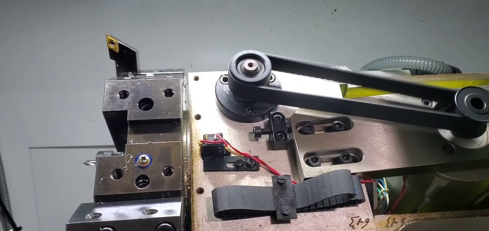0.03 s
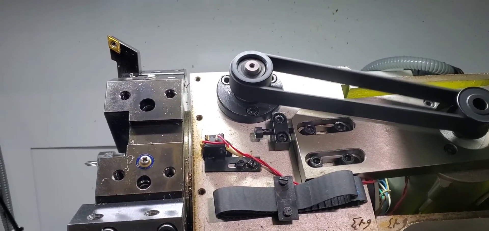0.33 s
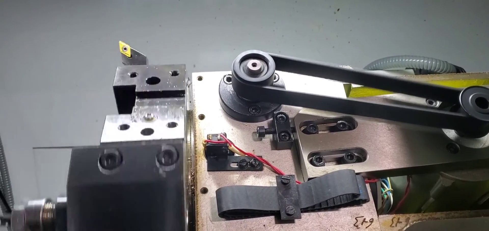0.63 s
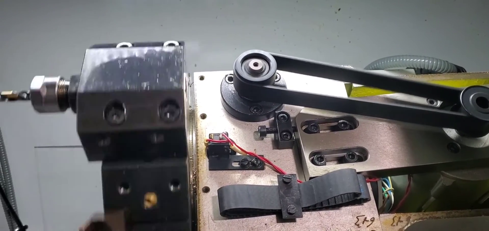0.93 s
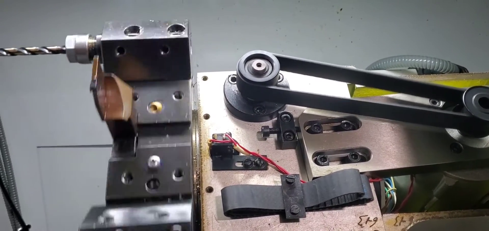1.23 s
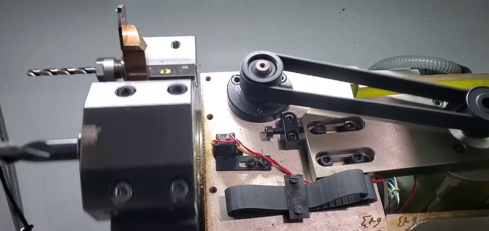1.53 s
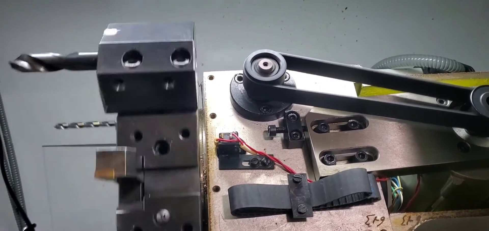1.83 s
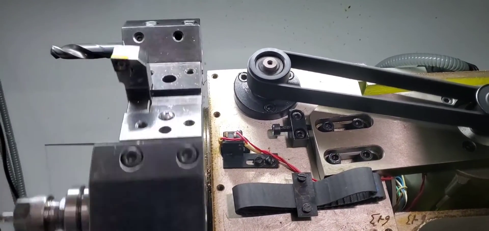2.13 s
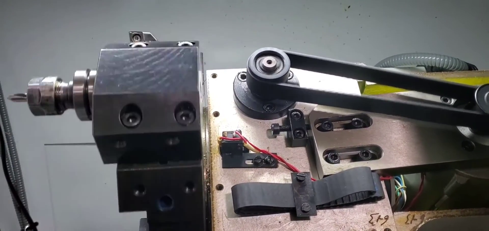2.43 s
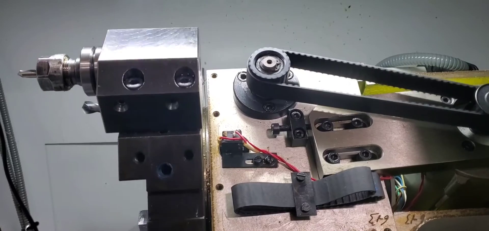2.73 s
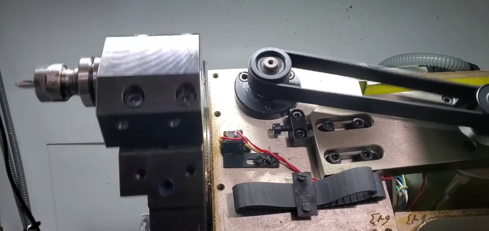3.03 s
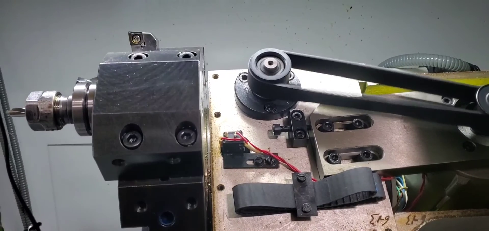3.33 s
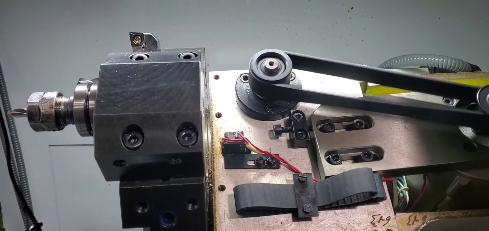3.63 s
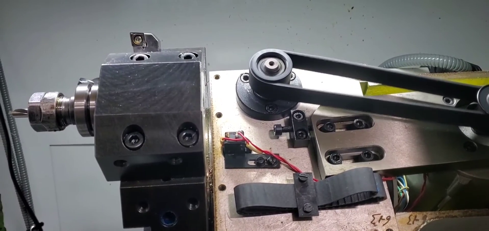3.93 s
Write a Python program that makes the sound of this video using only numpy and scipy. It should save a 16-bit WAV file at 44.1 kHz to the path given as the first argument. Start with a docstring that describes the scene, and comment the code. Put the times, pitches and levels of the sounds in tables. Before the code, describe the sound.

A lathe tool turret rotates close by inside a sheet-metal enclosure, over idling machinery. A solenoid chatters with a ringing hiss until an unlocking thump at about 0.5 seconds. A geared motor hums, with five evenly spaced metal clacks from 0.9 to 2.4 seconds, then coasts. Near 3 seconds come a faint squeak, a latching clack and a clamping clunk, and the chatter and hiss return until 4 seconds.

```python
"""A lathe's tool turret indexes inside its sheet-metal enclosure, close by, over idling machinery.
A mains solenoid chatters in a ringing hiss until the turret unlocks with a thump at 0.55 s.
A geared motor turns it, a pawl clacks at each of five stations, and from 2.4 s the motor coasts.
Near 3 s the head squeaks into its seat, the pawl latches and the turret clamps with a clunk.
The chatter and the hiss return."""
import sys
import numpy as np
from scipy import signal
from scipy.fft import rfft, irfft
from scipy.io import wavfile
from scipy.ndimage import uniform_filter1d

SR = 44100
rng = np.random.default_rng(int(sys.argv[2]) if len(sys.argv) > 2 else 0)


def waveform_to_disk(signal):
    """Save audio, clipped to [-1, 1], as 16-bit WAV at the path in sys.argv[1]."""
    frames = np.transpose(np.atleast_2d(signal))
    scaled = np.clip(frames, -1, 1) * 32767
    samples = np.round(scaled).astype(np.int16)
    wavfile.write(sys.argv[1], SR, samples)


N = 176400
TIME_S = np.arange(N) / SR
TAIL_S = TIME_S[:SR // 2]


def undb(db):
    """Decibels to gain."""
    return 10 ** (np.asarray(db) / 20)


def curve(rows, column=1):
    """One table column interpolated over time."""
    rows = np.array(rows, float)
    return np.interp(TIME_S, rows[:, 0], rows[:, column])


def unit(x):
    """Scale to unit mean energy per channel."""
    return x / np.sqrt(np.sum(x ** 2) / len(np.atleast_2d(x)))


def level(x, rms_db):
    """Scale to an rms level."""
    return x * undb(rms_db) / np.sqrt(np.mean(x ** 2))


def pan(left_db):
    """Stereo gains, left over right by left_db."""
    return undb(np.array([[left_db], [-left_db]]) / 2)


def colour(x, points):
    """Minimum-phase filter through (freq_hz, gain_db) points."""
    size = 2 ** 18
    hz, db = np.array(points, float).T
    bins_hz = np.arange(size // 2 + 1) * SR / size
    log_gain = np.log(undb(np.interp(np.log(bins_hz + 1), np.log(hz), db)))
    cepstrum = irfft(log_gain)[:size // 2]
    cepstrum[0] /= 2
    return irfft(rfft(x, size) * np.exp(rfft(2 * cepstrum, size)))[..., :x.shape[-1]]


# Stereo width: freq_hz, side_gain_db
WIDTH = [(60, -29), (120, -28), (200, -16), (380, -8), (700, -3), (1300, -1), (2400, 0), (16000, -.3)]

def spread(pair):
    """Two unrelated signals as a stereo field: narrow bass, wide treble."""
    side = colour(pair[1], WIDTH)
    return np.array([pair[0] + side, pair[0] - side])


def noise(size=N):
    """Diffuse stereo noise."""
    return spread(rng.standard_normal((2, size)))


def drift(rate_hz):
    """Slow random wander, rms 1."""
    hold = int(SR / rate_hz)
    steps = np.repeat(rng.standard_normal(N // hold + 1), hold)
    return level(uniform_filter1d(steps, hold)[:N], 0)


def decay(t60_s):
    """Exponential tail."""
    return np.exp(-np.log(1000) * TAIL_S / t60_s)


def ring(modes):
    """Metal modes, each at a random phase per channel."""
    return unit(sum(undb(db) * decay(t60_s) * np.sin(2 * np.pi * (hz * TAIL_S + rng.random((2, 1))))
                    for hz, db, t60_s in modes))


def add(track, start_s, sound):
    """Mix a sound into a track."""
    i = int(np.clip(start_s * SR, 0, N - 1))
    track[..., i:i + sound.shape[-1]] += sound[..., :N - i]


def contact(length_s):
    """Steel on steel: a rush of tiny rebounds that swells and dies."""
    age = TIME_S[:SR // 40] / length_s
    return unit(np.tanh(rng.standard_normal(len(age))) * np.sqrt(age) * np.exp(-age ** 2))


def crack(length_s, left_db):
    """Direct sound of a contact, in stereo."""
    return np.array([contact(length_s), contact(length_s)]) * pan(left_db)


def enclosure(spectrum):
    """Dense echoes off the sheet-metal walls; the treble dies first."""
    echoes = noise(len(TAIL_S))
    treble = signal.sosfilt(signal.butter(1, 7000, "high", fs=SR, output="sos"), echoes)
    tail = (echoes - treble) * decay(t60_s=0.23) + treble * decay(t60_s=0.063)
    build_up = 1 - np.exp(-TAIL_S / 0.0021)
    return unit(colour(tail * build_up, spectrum))


# Fan noise: freq_hz, gain_db
FAN_SPECTRUM = [(25, -29), (45, -5), (64, -6), (100, -16.5), (150, -10), (240, -8.5), (330, -9), (500, -21),
                (1050, -28), (1350, -41), (2100, -31), (3200, -34), (4200, -37), (6800, -38), (8500, -48),
                (9800, -37), (10700, -32), (12200, -32), (13300, -40), (16000, -37)]
# Machine hums: pitch_hz, level_db
SHOP_HUMS = [(59.4, -51.5), (176.8, -50), (329.7, -57.5), (360.3, -54), (1100, -69), (14595, -69),
             (15579, -74)]

def workshop():
    """Idling machinery: fan noise and wavering hums."""
    hums = sum(undb(db + drift(4.8)) * np.sqrt(2) * np.sin(2 * np.pi * hz * TIME_S + 0.1 * drift(2.76))
               for hz, db in SHOP_HUMS)
    return level(colour(noise(), FAN_SPECTRUM), rms_db=-48) + hums


def whine(pitch_hz=3230, pulse_hz=9):
    """Faint, pulsing electrical whine of the idle drive."""
    band = [(pitch_hz * 0.86, -40), (pitch_hz, 0), (pitch_hz * 1.06, -40)]
    pulse = (1 + np.sin(2 * np.pi * pulse_hz * TIME_S)) / np.sqrt(2)
    return level(colour(noise(), band), -64) * pulse


def squeak(pitch_hz=1105, peak_s=2.965, width_s=0.028):
    """Steel rubs briefly as the head creeps into its seat."""
    band = [(pitch_hz * 0.91, -40), (pitch_hz, 0), (pitch_hz * 1.023, -40)]
    swell = np.exp(-((TIME_S - peak_s) / width_s) ** 2)
    return level(colour(noise(), band), -48) * swell


# Motor harmonics: turn_multiple, gain_db
HUM_LINES = [(5, -36.5), (6, -31), (12, -58), (19, -68), (20, -67), (21, -50), (23, -51), (24, -61),
             (28, -49.5)]
# Hum envelope: time_s, gain_db
HUM_ENVELOPE = [(.55, -26), (.72, -13), (.8, -3.5), (.9, -4.5), (.935, -32), (.98, -4), (1.3, -7),
                (2.0, -2.5), (2.4, -4.5), (2.44, -9), (2.55, -23)]
# Gear noise: freq_hz, gain_db
GEAR_SPECTRUM = [(150, -16.5), (240, -3), (290, -31.5), (330, -10), (400, 2), (560, -4.5), (700, -6.5),
                 (820, -3), (1080, -1), (1300, -6), (1550, -13.5), (2130, -7), (2600, -14.5), (3700, -9.5),
                 (4400, -14.5), (6900, -13.5), (8200, -25), (16000, -29.5)]
# Gear and rumble envelope: time_s, gain_db
GEAR_ENVELOPE = [(.52, -1), (.57, 4.5), (.72, 1), (.88, 3), (1.0, -1.5), (1.6, -0.5), (2.1, -2), (2.41, -1),
                 (2.48, -9.5), (2.58, -15.5), (2.75, -30), (3.0, -15.5)]

def motor(turn_hz=20.02, zero_phase_s=1.512, repeat_share=0.55, throb_db=1.5, throb_lag_s=0.021):
    """The drive hums on multiples of its turn rate; the gears' grind throbs and partly repeats."""
    angle = 2 * np.pi * turn_hz * (TIME_S - zero_phase_s)
    hum = sum(undb(db + 1.4 * drift(5.84)) * np.sqrt(2) * np.cos(k * angle + 0.066 * drift(3.6))
              for k, db in HUM_LINES)
    one_turn = rng.standard_normal((2, int(SR / turn_hz)))
    teeth = np.tile(one_turn, int(N / SR * turn_hz) + 2)[:, :N]
    grind = np.sqrt(repeat_share) * spread(teeth) + np.sqrt(1 - repeat_share) * noise()
    gears = level(colour(grind, GEAR_SPECTRUM), -36)
    throb = undb(throb_db * np.cos(angle - 2 * np.pi * turn_hz * throb_lag_s))
    rumble_band = [(30, -20.5), (60, -18), (95, 3.5), (130, -14), (260, -18.5), (500, -19.5), (2000, -37)]
    rumble = level(colour(noise(), rumble_band), -40)
    return hum * undb(curve(HUM_ENVELOPE)) + (gears * throb + rumble) * undb(curve(GEAR_ENVELOPE))


# Hiss: freq_hz, gain_db
HISS_SPECTRUM = [(25, -43), (50, -8.5), (85, 20.5), (130, 8), (300, -2.5), (700, -7), (1050, -2),
                 (1400, -2), (1800, -6.5), (2200, 5.5), (4000, -4.5), (6800, -2), (8000, -31), (15500, -2)]
# Hiss envelope: time_s, gain_db
HISS_ENVELOPE = [(0, -27.5), (.3, -32), (.54, -31), (.67, -38), (.74, -54), (.85, -74), (3.0, -84),
                 (3.08, -38.5), (3.2, -31), (3.7, -31.5), (4, -29)]
# Valve and bracket ring, shared with the solenoid: pitch_hz, gain_db, t60_s
VALVE_MODES = [(1049, -5, 0.3), (1126, -7, 0.19), (2087, -2.5, .25), (2233, -2, 0.16), (2378, -6, 0.15),
               (2580, -10, 0.22), (2940, -10, 0.22), (3550, 4, 0.084), (3530, -2, .18), (4190, -4, 0.17),
               (4885, 2.5, 0.072), (5540, 4, 0.09), (6700, 0.5, 0.071), (7000, -3, .08)]

def hiss():
    """A ringing hiss fills the enclosure while the solenoid chatters."""
    singing = signal.fftconvolve(rng.standard_normal((2, N)), ring(VALVE_MODES), mode="same", axes=1)
    wash = level(colour(noise(), HISS_SPECTRUM), 0)
    envelope = undb(curve(HISS_ENVELOPE) + 0.53 * drift(25))
    return (wash + level(singing, -4)) * envelope * pan(left_db=1.6)


# Turret body: pitch_hz, gain_db, t60_s
BODY_MODES = [(87.5, -2.5, 0.54), (96.9, 0.5, 0.49), (153, -2.5, 0.16), (247.7, -2, 0.19),
              (328, -6.5, 0.25), (418, -1.5, .15), (550, -17, 0.33), (641, -6, 0.22)]
# Lifting and seating thumps: start_s, gain_db, rise_s, cutoff_hz, t60_scale
THUMPS = [(.556, -12, 0.023, 115, 0.51), (.55, -32.5, 0.0055, 800, 1.2), (.615, -21.5, 0.014, 105, 1.17),
          (2.514, -34.5, 0.016, 109, 2.5), (3.036, -21.5, 0.0057, 600, 1.08), (3.059, -21, .008, 134, 0.95),
          (3.114, -17, 0.0176, 109, 0.65)]

def turret():
    """The heavy head lifts off its coupling and seats again; soft pushes wake only the low modes."""
    track = np.zeros((2, N))
    panel_band = [(60, -14), (160, 7), (600, -10), (1500, -11), (5000, -54)]
    for start_s, gain_db, rise_s, cutoff_hz, t60_scale in THUMPS:
        lowpass = lambda hz: 1 / np.sqrt(1 + (hz / cutoff_hz) ** 4)
        body = sum(undb(db) * lowpass(hz) * decay(t60_s * t60_scale)
                   * np.sin(2 * np.pi * hz * (TAIL_S - rise_s)) for hz, db, t60_s in BODY_MODES)
        panels = level(colour(noise(len(TAIL_S)), panel_band), -2.5)
        panels *= decay(t60_s=0.39) * np.sqrt(lowpass(590))
        attack = np.clip(TAIL_S / rise_s, 0, 1)
        add(track, start_s, undb(gain_db) * (body + panels) * attack)
    return track


def tilt(rows, db_per_octave):
    """Tilt a spectrum or mode table about 5 kHz."""
    return [(hz, db + db_per_octave * np.log2(hz / 5000), *rest) for hz, db, *rest in rows]


# Pawl drops: start_s, gain_db, scrape_s, notch_hz, slope_db_per_octave
CLACKS = [(0.9198, -2.5, 0.0011, 4430, 0), (1.2928, -2.5, 0.0019, 4050, 0.5),
          (1.6665, 0.5, 0.0047, 4740, 1), (2.0419, -0.5, 0.003, 4554, -1), (2.4152, -1, 0.0023, 6590, -0.5),
          (3.0056, -1, 0.0021, 5460, -6)]
# Direct crack: freq_hz, gain_db
CLACK_CRACK = [(1000, -29.5), (3000, -13), (6000, 5), (8000, -4), (11000, 3.5), (15500, -1.5)]
# Wall echoes: freq_hz, gain_db
CLACK_ECHO = [(300, -32.5), (900, -18.5), (1400, -14), (1900, -12), (2700, -9), (3500, -3), (4500, -3),
              (5500, -6), (6500, 2), (8000, -6), (10300, -4), (13000, 1), (15500, -0.5)]
# Pawl ring: pitch_hz, gain_db, t60_s
PAWL_MODES = [(1837, -6, .2), (2090, -6, .2), (2384, -4, .2), (3150, -5, .15), (3467, -2, .18),
              (4350, 0, .22), (5570, -5, .12), (6200, -1, .12), (6990, -2, .1)]
# Notch ring: pitch_ratio, gain_db, t60_s
NOTCH_MODES = [(.96, 6, 0.24), (1, 6, 0.24), (1.025, -13, .17)]

def pawl(clack_db=-32.5, ring_db=-11):
    """The pawl drops at five stations, then latches; each notch rings at its own pitch."""
    track = np.zeros((2, N))
    for start_s, gain_db, scrape_s, notch_hz, slope in CLACKS:
        notch = ring([(notch_hz * ratio, db, t60_s) for ratio, db, t60_s in NOTCH_MODES])
        echoes = enclosure(tilt(CLACK_ECHO, slope)) * pan(left_db=1.6)
        clack = echoes + undb(ring_db) * (ring(tilt(PAWL_MODES, slope)) + notch)
        direct = unit(colour(crack(scrape_s, left_db=-7), tilt(CLACK_CRACK, slope)))
        add(clack, 0, undb(-3.5) * direct)
        add(track, start_s, undb(clack_db + gain_db) * np.sqrt(SR) * unit(clack))
    return track


# Solenoid energised: start_s, end_s
CHATTER_SPANS = [(.0012, .675), (3.0606, 4.0)]
# Tap force: time_s, gain_db, odd_tap_offset_db
TAP_FORCE = [(0, 2, -7), (.07, 0.5, -3), (.1, -0.5, -27), (.22, 1, -30), (.3, -1, -24), (.468, -1, -24),
             (.487, -16, -25), (.501, 0, -25), (.53, -5.5, 12.5), (.553, -14, -20), (.575, 3.5, -26),
             (.615, 4, -9), (.635, 4.5, -24), (.651, -23, -1), (.661, 1, 4), (.675, 1, -4),
             (3.06, -10, -14), (3.08, -7, -17), (3.093, 9.5, -21), (3.11, 0, -19), (3.13, -2, -15),
             (3.147, -8, -10), (3.16, 0.5, -25), (3.21, -5, 2.5), (3.28, -2.5, -1), (3.5, -2, -3),
             (3.7, -2.5, 2.5), (4.0, -3, 1.5)]
# Armature strokes, repeating every three mains cycles: gain_db
STROKE_DB = [3.5, 2.5, -3.5]
# Direct crack: freq_hz, gain_db
TAP_CRACK = [(1000, -42), (4000, -6), (7000, -1.5), (10000, 3), (11300, -6), (14300, 2.5), (16000, -12)]
# Wall echoes: freq_hz, gain_db
TAP_ECHO = [(150, -28.5), (300, -5.5), (560, -7.5), (660, -4), (720, -7.5), (850, -1.5), (1100, -0.5),
            (1250, -10), (1750, -8), (2150, -4), (3200, -3), (3650, -0.5), (4500, -1.5), (5800, -3.5),
            (6850, 1.5), (7950, -9), (10000, -4.5), (11300, -11), (14500, -2.5), (16000, -9)]

def solenoid(mains_hz=60, chatter_db=-25, scatter_db=1.2, jitter_s=0.0003):
    """The armature taps every half mains cycle; the taps ring the valve and the sheet-metal walls."""
    strokes = len(STROKE_DB)
    taps, cracks, ringing = np.zeros((strokes, N)), np.zeros((2, N)), np.zeros((2, N))
    force_db, odd_tap_db = curve(TAP_FORCE), curve(TAP_FORCE, column=2)
    for start_s, end_s in CHATTER_SPANS:
        for k, due_s in enumerate(np.arange(start_s, end_s, 1 / (2 * mains_hz))):
            i = min(int(due_s * SR), N - 1)
            stroke = k // 2 % strokes
            tap_s = due_s + rng.normal(0, jitter_s)
            gain = undb(force_db[i] + k % 2 * odd_tap_db[i] + rng.normal(STROKE_DB[stroke], scatter_db))
            add(taps[stroke], tap_s, gain * contact(length_s=0.0011))
            add(cracks, tap_s, gain * crack(length_s=0.0015, left_db=-4))
    for train in taps:
        response = unit(enclosure(TAP_ECHO) + undb(-14.5) * ring(VALVE_MODES)) * pan(left_db=1.2)
        ringing += signal.fftconvolve(train[None], response, axes=1)[:, :N]
    chatter = undb(-2) * ringing + undb(-2.5) * colour(cracks, TAP_CRACK)
    return undb(chatter_db) * np.sqrt(SR / mains_hz) * chatter


def scene():
    """Stereo sum of all sources."""
    return solenoid() + hiss() + pawl() + turret() + motor() + squeak() + whine() + workshop()


def record(dry, cutoff_hz=15850):
    """Steep low-pass on the mix."""
    return signal.sosfilt(signal.ellip(10, 0.2, 80, cutoff_hz, fs=SR, output="sos"), dry)


dry = scene()
out = record(dry)
waveform_to_disk(out)
```